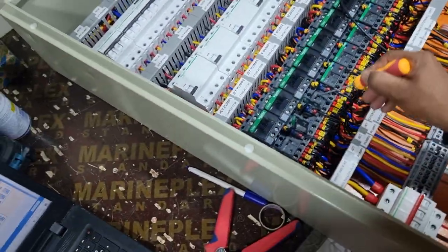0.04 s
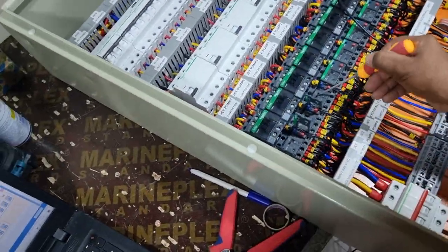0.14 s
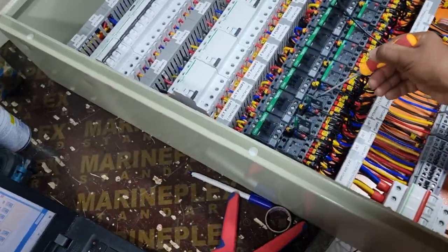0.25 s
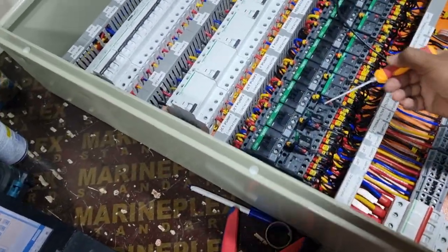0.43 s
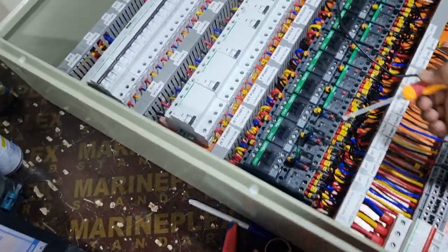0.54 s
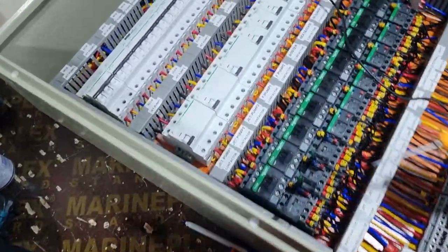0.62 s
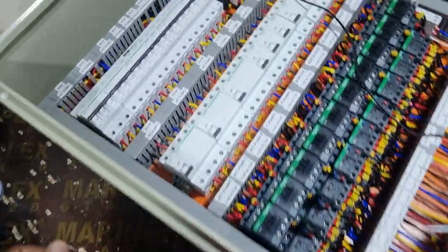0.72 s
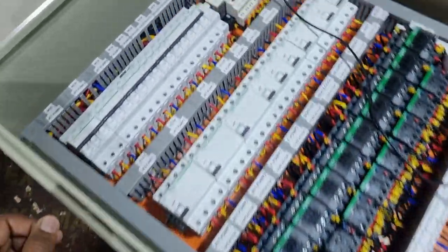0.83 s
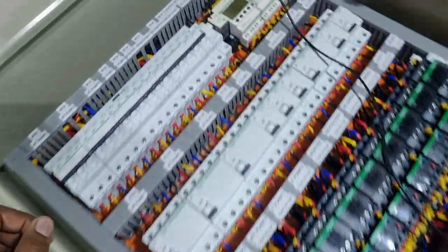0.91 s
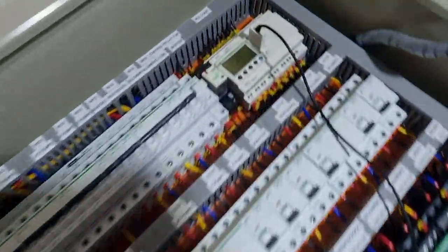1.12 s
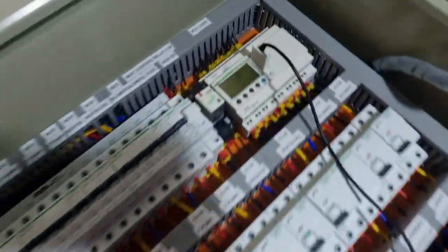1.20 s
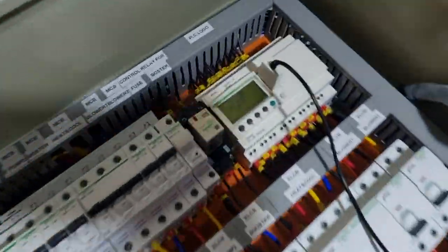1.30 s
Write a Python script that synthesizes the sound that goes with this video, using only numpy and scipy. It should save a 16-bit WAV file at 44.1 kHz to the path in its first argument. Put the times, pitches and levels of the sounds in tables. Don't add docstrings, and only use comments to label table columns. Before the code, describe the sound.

A loud mechanical relay clack with a heavy low thud in an electrical cabinet, over faint hum

```python
import sys
import numpy as np
from scipy import signal
from scipy.fft import rfft, irfft, next_fast_len
from scipy.io import wavfile
from scipy.ndimage import uniform_filter1d, map_coordinates

SR = 44100
rng = np.random.default_rng(int(sys.argv[2]) if len(sys.argv) > 2 else 0)


def store_pcm(level_fs):
    pcm = np.round(np.clip(level_fs, -1, 1) * 32767).astype(np.int16)
    wavfile.write(sys.argv[1], SR, np.atleast_2d(pcm).T)


def invert_db(x):
    u = np.asarray(x, float) / 20
    return 10 ** u


N = 59535
NOW = np.arange(N) / SR
LEFT_RIGHT = np.array([[.5], [-.5]])


def unit(x):
    return x / np.sqrt(np.mean(x ** 2) + 1e-20)


def along(points, hz):
    f, v = np.transpose(points)
    return np.interp(np.log(hz + 1), np.log(f + 1), v)


def wobble(rate):
    knots = rng.standard_normal(int(N * rate / SR) + 4)
    return map_coordinates(knots, [np.arange(N) * rate / SR])


def filtered(x, response):
    m = next_fast_len(N + SR // 2)
    return irfft(rfft(x, m) * response(np.fft.rfftfreq(m, 1 / SR)), m)[..., :N]


def causal(gain):
    cepstrum = irfft(np.log(gain + 1e-6))
    half = cepstrum.shape[-1] // 2
    cepstrum[..., 1:half] *= 2
    cepstrum[..., half + 1:] = 0
    return np.exp(rfft(cepstrum))


def peak(f, hz, width_hz):
    damping = 1j * f * width_hz
    return damping / (hz * hz - f * f + damping)


def burst(s, length, t60):
    t = NOW - s
    return (t >= 0) * invert_db(-60 * np.clip(t - length, 0, 1) / t60)


def swell(s, hz, swell_s):
    u = np.clip(NOW - s, 0, 1) / swell_s
    return -np.sin(2 * np.pi * hz * swell_s * u) * (u * np.exp(1 - u)) ** 2


# (frequency [Hz], left-right likeness [0-1])
ALIKE = [(60, 1), (130, 0.99), (290, .55), (640, 0.12), (2000, 0.0088)]


def mid_side_gain(hz):
    angle = np.arccos(np.clip(along(ALIKE, hz), -1, 1)) / 2
    return np.array([np.cos(angle), np.sin(angle)])


def alike(pair):
    mid, side = filtered(np.array([pair[0] + pair[1], pair[0] - pair[1]]), mid_side_gain)
    return np.array([mid + side, mid - side]) / np.sqrt(2)


def rush(spectrum, patchy_db):
    z = signal.stft(rng.standard_normal((2, N)), nperseg=512)[2]
    patches = uniform_filter1d(rng.standard_normal(z.shape[1:]), 5, 0)
    patches = unit(uniform_filter1d(patches, 9, 1))
    pair = signal.istft(z * invert_db(patchy_db * patches), nperseg=512)[1][:, :N]
    mid, side = filtered(pair, lambda hz: invert_db(along(spectrum, hz)) * mid_side_gain(hz))
    return unit(np.array([mid + side, mid - side]))


# (frequency [Hz], level [dB rms])
HUM = [(198.5, -76.5), (300.8, -70.5), (412, -84.5), (270, -88.5)]
# (frequency [Hz], level [dB])
RUMBLE = [(12, -33), (30, -11), (60, -5), (82, 1), (105, -13.5), (130, -16.5), (250, -25), (400, -61)]
# (frequency [Hz], level [dB])
AIR = [(150, -18.5), (300, -2.5), (500, -8.5), (900, -13.5), (3500, -18.5), (6500, -17), (9000, -24),
       (16000, -18)]
RUMBLE_DB, AIR_DB = -62, -66.5
HUM_GROWS_DB, RUMBLE_GROWS_DB = 3.5, 4


def workshop():
    hum = 0
    for hz, db in HUM:
        cycles = hz * NOW + rng.random() + .08 * rng.standard_normal((2, 1))
        hum = hum + invert_db(db + 0.54 * wobble(8.2)) * np.sqrt(2) * np.sin(2 * np.pi * cycles)
    rumble = invert_db(RUMBLE_DB + RUMBLE_GROWS_DB * NOW + .8 * wobble(24)) * rush(RUMBLE, patchy_db=-1.5)
    return hum * invert_db(HUM_GROWS_DB * NOW) + rumble + invert_db(AIR_DB) * rush(AIR, patchy_db=0.9)


# (frequency [Hz], left over right [dB])
LEAN = [(60, -5), (180, 0.5), (550, -2), (1650, 1), (4970, -7), (15000, -4.5)]
# (time [s], level [dB], centre [Hz], width [Hz], length [s])
SCRAPES = [
    (0.1991, -20, 3170, 5000, 0.01),
    (.1988, -30.5, 7100, 4700, .007),
    (.243, -47.5, 360, 72, .03),
    (.2445, -31.5, 6900, 730, 0.012),
    (.2446, -28, 4850, 660, 0.0059),
    (.2447, -41, 13000, 2500, 0.023),
    (.3085, -19.5, 4030, 4000, 0.0061),
    (.1984, -26.5, 12500, 4400, 0.0088),
    (.1888, -45, 7300, 700, .003),
    (.1928, -37, 5300, 2000, .003),
]
LEAD_IN_RISE_DB_PER_S, LEAD_IN_STEP_DB, SCRAPE_T60 = 1299, -13.5, .04


def scrapes():
    sound = np.zeros((2, N))
    for s, db, hz, w, length in SCRAPES:
        before = NOW - s
        lead_in = (before < 0) * invert_db(LEAD_IN_STEP_DB + LEAD_IN_RISE_DB_PER_S * np.clip(before, -1, 0))
        puff = rng.standard_normal((2, N)) * (lead_in + burst(s, length, SCRAPE_T60))
        band = filtered(puff, lambda f: peak(f, hz, w) ** 2 * invert_db(LEFT_RIGHT * along(LEAN, f)))
        sound += invert_db(db) * np.sqrt(SR / w) / 2 * band
    return sound


CHATTER_PER_S, CHATTER_SPREAD_DB, RATTLE_DB = 3000, 2, 0
STRIKE_DB, BODY_DB = 11, -1.5


def clack(blows, body, tone):
    contacts = rng.random((2, N)) < CHATTER_PER_S / SR
    contacts = contacts * invert_db(CHATTER_SPREAD_DB * rng.standard_normal((2, N)))
    chatter = unit(contacts * np.sign(rng.standard_normal((2, N))))
    drive = unit(chatter + invert_db(RATTLE_DB) * rng.standard_normal((2, N)))
    drive = drive * sum(invert_db(db) * burst(s, length, t60) for s, db, length, t60 in blows)
    for s, db, *_ in blows:
        strike = np.arange(N) == round(s * SR) + np.array([[9], [0]])
        drive = drive + invert_db(db + STRIKE_DB) * strike

    def colour(f):
        resonances = sum(np.abs(peak(f, hz, w)) ** 2 for hz, w in body)
        gain = invert_db(along(tone, f)) * (1 + invert_db(BODY_DB) * resonances) * invert_db(LEFT_RIGHT * along(LEAN, f))
        return causal(unit(gain))
    return filtered(drive, colour)


# (time [s], level [dB], chatter length [s], dying t60 [s])
LATCH = [
    (.2057, -10, 0.0021, 0.031),
    (.2105, -19, 0.0022, 0.028),
    (.2155, -23, 0.0012, 0.067),
]
# (frequency [Hz], width [Hz])
LATCH_BODY = [(1240, 160), (3060, 150), (3430, 110), (3860, 170), (5350, 160), (6000, 360), (6900, 570),
              (8900, 350), (12400, 190)]
# (frequency [Hz], level [dB])
LATCH_TONE = [(60, -50), (200, -22), (340, -9.5), (520, -16.5), (1100, -4.5), (2000, -12.5), (3300, -10),
              (7000, -14.5), (16000, -15.5)]


def latch():
    return clack(LATCH, LATCH_BODY, LATCH_TONE)


# (frequency [Hz], left over right [dB])
RING_LEAN = [(300, 0.5), (700, 3), (1300, 1), (2400, -2), (4400, -10), (8000, -4.5)]
RING_RISE_S, RING_UNSTEADY_DB, PORTS_APART_S = 0.00069, 2, 0.000095


def rings(modes):
    sound = np.zeros((2, N))
    for s, hz, db, t60 in modes:
        t = np.clip(NOW - s - np.array([[PORTS_APART_S], [0]]), 0, 1)
        level_db = db - 60 * t / t60 + RING_UNSTEADY_DB * wobble(90) + LEFT_RIGHT * along(RING_LEAN, hz)
        tone = np.sin(2 * np.pi * (hz * t + rng.random()))
        sound += invert_db(level_db) * (1 - np.exp(-t / RING_RISE_S)) * tone
    return sound


# (start [s], frequency [Hz], level [dB], t60 [s])
LATCH_RINGS = [(.2058, 310, -31, .1), (.2056, 655, -24.5, .1), (.2056, 1061, -25.5, .1),
               (.2057, 1195, -14.5, 0.046), (.2065, 1295, -20, 0.048), (.2058, 1620, -26, .05),
               (.2058, 1927, -26, .05), (.2056, 2600, -18, 0.042), (.2057, 3058, -18.5, 0.091),
               (.2057, 3432, -21, 0.037), (.2056, 3890, -23, .04), (.2057, 6000, -24, 0.064),
               (.2056, 7700, -23.5, .06), (.2057, 6440, -20, 0.062)]


def latch_rings():
    return rings(LATCH_RINGS)


# (frequency [Hz], t60 [s])
CABINET = [(150, 0.44), (500, 0.33), (2000, 0.29), (6000, 0.26), (10000, 0.18), (15000, 0.17)]
# (frequency [Hz], level [dB])
CABINET_TILT = [(200, 8.5), (1000, -0.5), (5000, -1), (15000, 0)]
CABINET_DB = -8


def cabinet(x):
    hz, t, z = signal.stft(rng.standard_normal((2, SR // 2)), SR, nperseg=256)
    decay_db = along(CABINET_TILT, hz)[:, None] - 60 * t / along(CABINET, hz)[:, None]
    tail = signal.istft(z * invert_db(decay_db), SR, nperseg=256)[1]
    tail = tail / np.linalg.norm(tail[0])
    return invert_db(CABINET_DB) * signal.fftconvolve(x, tail, axes=1)[:, :N]


# (time [s], boom [dB], pitch [Hz], swell time [s], ring [dB])
PUSHES = [
    (0.2113, -32.5, 74, 0.021, -40.5),
    (0.239, -34, 76.2, 0.0077, -28),
    (0.312, -20.5, 72.3, 0.026, -19.5),
    (0.3168, -12, 80.3, 0.035, -57.5),
]
# (frequency [Hz], level [dB], t60 [s])
OVERTONES = [(193.1, -35, 0.41), (355.5, -28.5, 0.15), (422, -31, 0.3), (663, -31.5, 0.15), (900, -54, 1),
             (950, -50, 0.51), (1175, -54, 0.61), (714, -54, 0.6)]
PLATE_HZ, PLATE_T60, PLATE_RISE_S, PLATE_SIDE_DB = 79.42, 0.92, 0.0073, -16
DAMPED_AT_S, DAMPED_T60 = .688, 0.09


def plate():
    sound = np.zeros(N)
    for s, boom_db, hz, swell_s, ring_db in PUSHES:
        t = np.clip(NOW - s, 0, 2)
        decay = invert_db(ring_db - 60 * t / PLATE_T60) * (1 - np.exp(-t / PLATE_RISE_S))
        sound = sound - np.sin(2 * np.pi * PLATE_HZ * t) * decay + invert_db(boom_db) * swell(s, hz, swell_s)
    sound = sound * invert_db(-60 * np.clip(NOW - DAMPED_AT_S, 0, 1) / DAMPED_T60)
    late = np.roll(sound, round(SR / PLATE_HZ / 4)) * invert_db(PLATE_SIDE_DB)
    t = np.clip(NOW - DROPOUT[1][0], 0, 2)
    upper = 0
    for hz, db, t60 in OVERTONES:
        level = invert_db(db + 2.7 * wobble(22) - 60 * t / t60)
        upper = upper + level * np.sin(2 * np.pi * (hz * t + rng.random((2, 1)) * hz / 1500))
    return np.array([sound + late, sound - late]) + upper * (1 - np.exp(-t / 0.0013))


# (time [s], level [dB], chatter length [s], dying t60 [s])
DROPOUT = [
    (.3130, -12.5, 0.0097, 0.045),
    (.328, -28, 0.013, .08),
]
# (frequency [Hz], width [Hz])
DROPOUT_BODY = [(645, 100), (1185, 37), (1540, 49), (2720, 370), (3820, 52), (4250, 43), (5700, 67),
                (7420, 250), (8300, 150), (10400, 350)]
# (frequency [Hz], level [dB])
DROPOUT_TONE = [(60, -38.5), (125, -6), (180, -12.5), (600, -10), (1100, -5), (1800, -10.5), (4000, -8.5),
                (8000, -12.5), (16000, -17.5)]
RAIL_HZ, RAIL_LATE_S = 1267, .007


def dropout():
    def rail(f):
        low = 1 / (1 + (f / RAIL_HZ) ** 4)
        return 1 - low + low * np.exp(-2j * np.pi * f * RAIL_LATE_S)
    return filtered(clack(DROPOUT, DROPOUT_BODY, DROPOUT_TONE), rail)


# (start [s], frequency [Hz], level [dB], t60 [s])
DROPOUT_RINGS = [(.319, 641, -19.5, 0.07), (.318, 1182, -18.5, 0.073), (.3131, 1533, -19, 0.07),
                 (.3131, 1778, -18.5, .06), (.3133, 2710, -22.5, 0.11), (.3131, 4400, -25.5, .12),
                 (.3132, 3835, -17.5, .07), (.3135, 3900, -17.5, .06), (.3133, 4698, -24.5, 0.066),
                 (.314, 4942, -26.5, .12), (.314, 5280, -24.5, 0.11), (.316, 7200, -23, 0.064),
                 (.3133, 5200, -20, .07), (.3133, 7440, -24.5, 0.074)]


def dropout_rings():
    return rings(DROPOUT_RINGS)


# (start [s], frequency [Hz], level [dB], t60 [s])
SHEET_RINGS = [(.33, 2196, -40.5, .14), (0.329, 2595, -47.5, .24), (.33, 2745, -48.5, .31),
               (.33, 3230, -48, .2), (0.329, 4457, -52.5, .4), (.33, 4732, -47, .22),
               (.33, 5163, -46.5, .21), (.33, 5712, -50.5, .28), (0.2437, 4790, -32, .05),
               (0.2437, 6790, -32.5, .04)]


def sheet_rings():
    return rings(SHEET_RINGS)


# (time [s], level [dB], centre [Hz], width [Hz], length [s])
TICKS = [(.5062, -37.5, 6240, 2487, 0.00094), (.5063, -52, 3970, 4000, 0.00028),
         (.5064, -52, 14100, 4000, 0.00071), (0.51, -51, 14300, 3000, .001),
         (.5198, -47.5, 6190, 2460, 0.00054), (.5199, -52, 13600, 3040, 0.00077),
         (.602, -63, 12270, 6010, 0.0012), (0.613, -59, 4460, 3040, 0.00069),
         (0.637, -57, 792, 1200, 0.00061), (0.665, -68.5, 6000, 2502, 0.00084),
         (0.675, -65, 6030, 4000, 0.00054), (.7651, -47.5, 4300, 1476, 0.0012),
         (.7652, -49.5, 2800, 1210, 0.0012), (0.7707, -49, 2910, 1013, 0.0014),
         (.917, -52, 6000, 2500, 0.0094), (.9171, -55, 11960, 900, 0.011), (0.918, -57, 1877, 403, 0.0089),
         (0.9181, -58.5, 2570, 498, 0.0076), (.5065, -55, 2660, 1500, 0.00062),
         (0.692, -60, 1910, 500, .02), (1.122, -62.5, 6500, 1520, 0.006)]
TICK_T60, TICK_LEAN_DB, CLICK_DB = 0.0054, -7.5, 14.5


def ticks():
    sound = np.zeros((2, N))
    for s, db, hz, w, length in TICKS:
        click = invert_db(CLICK_DB) * (np.arange(N) == round(s * SR) + np.array([[1], [0]]))
        puff = rng.standard_normal((2, N)) * burst(s, length, TICK_T60) + click
        sound += invert_db(db) * np.sqrt(SR / w) / 2 * filtered(puff, lambda f: peak(f, hz, w) ** 2)
    return sound * invert_db(LEFT_RIGHT * TICK_LEAN_DB)


# (time [s], level [dB], note of the hollow [Hz])
SLIDE = [(.66, -66, 1850), (.685, -62.5, 1780), (.74, -66, 1890), (.8, -59.5, 2040), (0.899, -63, 1877),
         (1.05, -60.5, 1646), (1.2, -60.5, 1400), (1.28, -60.5, 1210), (1.35, -65.5, 1306)]
# (frequency [Hz], level [dB])
SLEEVE = [(250, -26.5), (450, 2.5), (900, -7), (2500, -4), (4500, -8), (6500, -6.5), (9500, -20.5),
          (16000, -11.5)]
HOLLOW_DB, HOLLOW_WIDTH_HZ, SLIDE_LEAN_DB = 8, 220, -4.5
UPPER_HOLLOW, UPPER_HOLLOW_DB = 2.2, 0


def sleeve():
    s, level_db, hollow_hz = np.transpose(SLIDE)
    grains_db = 2.29 * rng.standard_normal(N).clip(-2, 3) + 1.224 * wobble(40)
    cloth = unit(rush(SLEEVE, patchy_db=0.5) * invert_db(grains_db))
    f, t, z = signal.stft(cloth, SR, nperseg=512)
    note = np.interp(t, s, hollow_hz)
    hollow = np.abs(peak(f[:, None], note, HOLLOW_WIDTH_HZ)) ** 2
    upper = np.abs(peak(f[:, None], UPPER_HOLLOW * note, 2 * HOLLOW_WIDTH_HZ)) ** 2
    gain = 1 + invert_db(HOLLOW_DB) * hollow + invert_db(UPPER_HOLLOW_DB) * upper
    cloth = unit(signal.istft(z * gain, SR, nperseg=512)[1][:, :N])
    return cloth * invert_db(np.interp(NOW, s, level_db, left=-120) + LEFT_RIGHT * SLIDE_LEAN_DB)


# (time [s], level [dB], pitch [Hz], swell time [s])
BUMPS = [
    (.75, -54, 76.6, 0.027),
    (0.8447, -45, 74, 0.015),
    (0.67, -48, 80.5, 0.016),
    (1.015, -52.5, 74.7, 0.012),
    (1.2079, -43, 70.7, 0.018),
    (1.21, -51, 149, 0.015),
    (1.253, -48.5, 61, 0.018),
    (1.29, -57.5, 145, 0.04),
]


def bumps():
    return sum(invert_db(db) * swell(s, hz, swell_s) for s, db, hz, swell_s in BUMPS)


ROOM_LEAN_DB = -2.5


def scene():
    around = (workshop() + bumps()) * invert_db(LEFT_RIGHT * ROOM_LEAN_DB)
    parts = [scrapes() + latch(), dropout() + ticks()]
    mechanism = alike(sum(x + cabinet(x) for x in parts))
    ringing = latch_rings() + dropout_rings() + sheet_rings()
    return around + mechanism + ringing + plate() + sleeve()


def roll_off(x):
    return signal.sosfilt(signal.butter(12, 16980, fs=SR, output="sos"), x)


# (frequency [Hz], gain [dB])
MICROPHONE = [(6500, 1), (8000, -1), (9800, -6.5), (11000, -7), (12300, -1.5), (15500, -6.5)]
CEILING, TOP_HZ = .9, 15750


def record(dry):
    x = filtered(dry, lambda hz: causal(invert_db(along(MICROPHONE, hz))))
    x = x / (1 + np.abs(x / CEILING) ** 6) ** (1 / 6)
    x = filtered(x, lambda hz: 1 / (1 + (hz / TOP_HZ) ** 80))
    return roll_off(x)


dry = scene()
out = record(dry)
store_pcm(out)
```